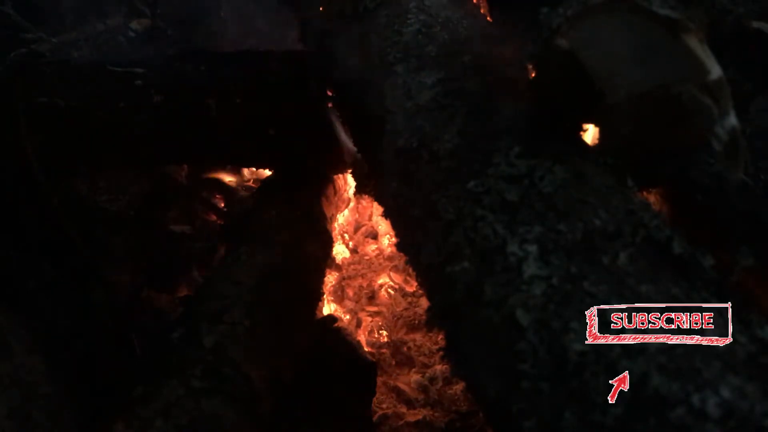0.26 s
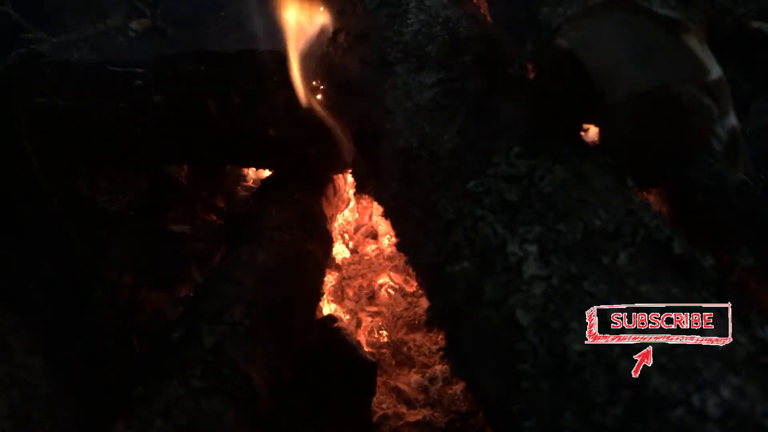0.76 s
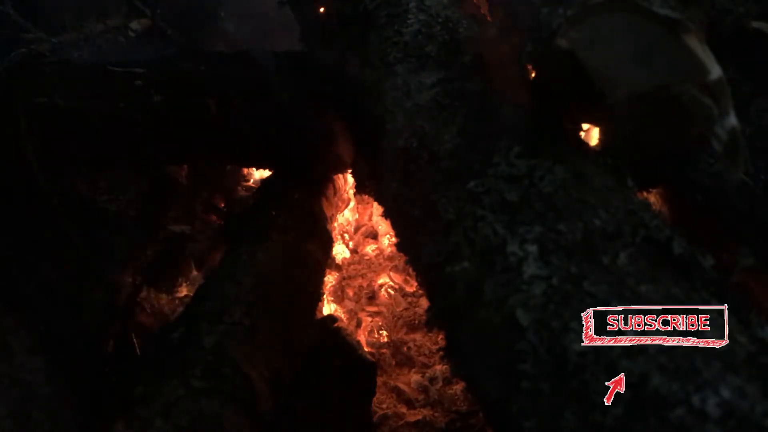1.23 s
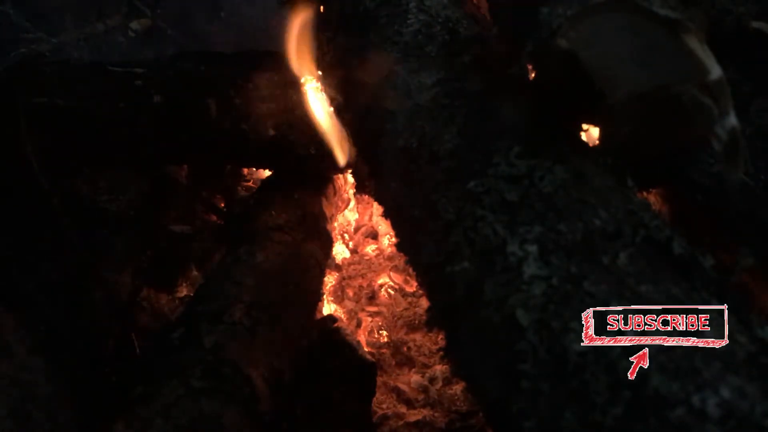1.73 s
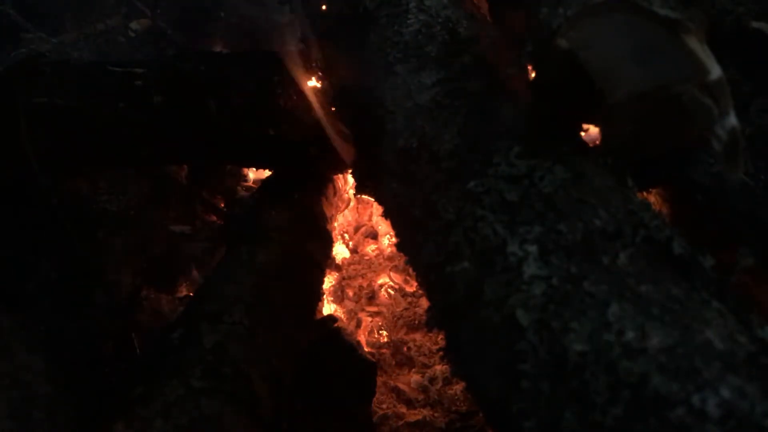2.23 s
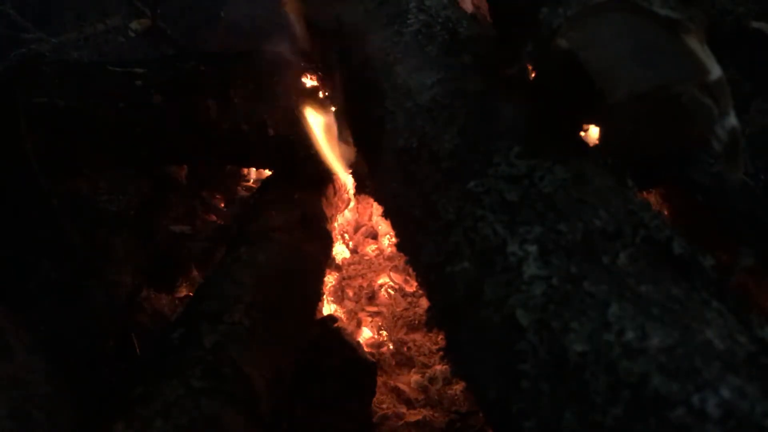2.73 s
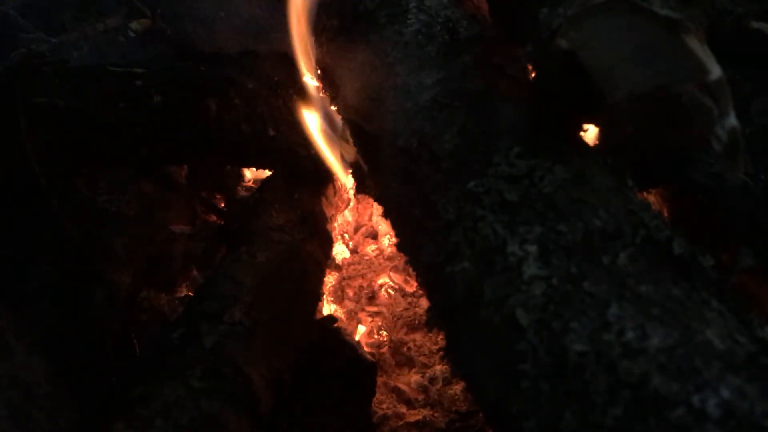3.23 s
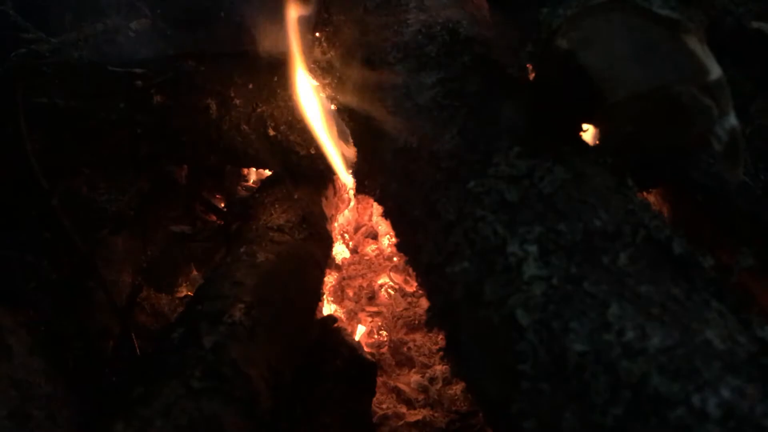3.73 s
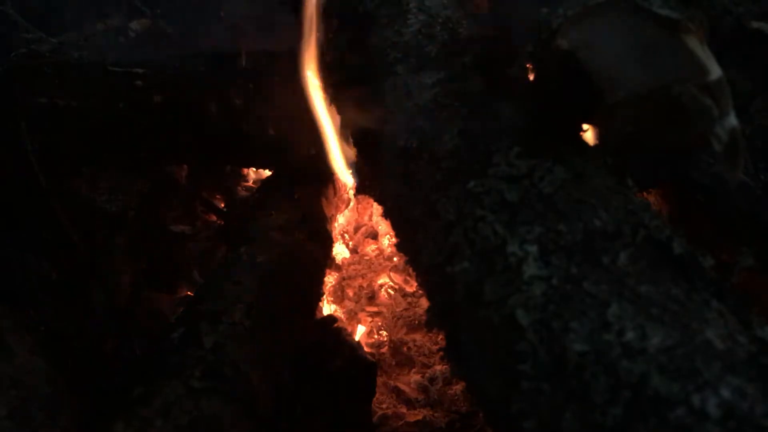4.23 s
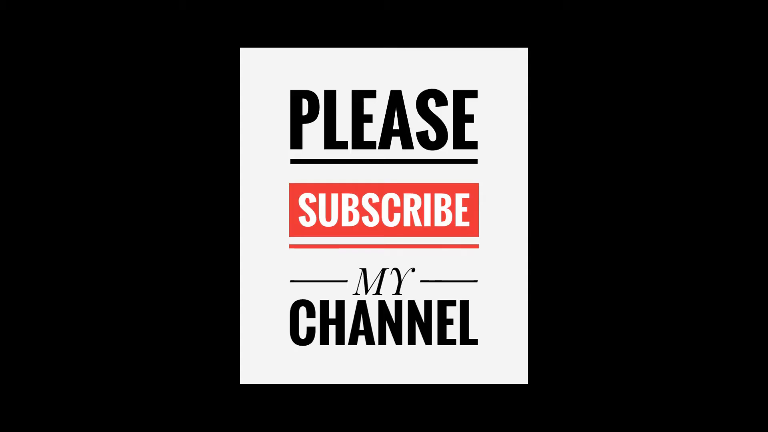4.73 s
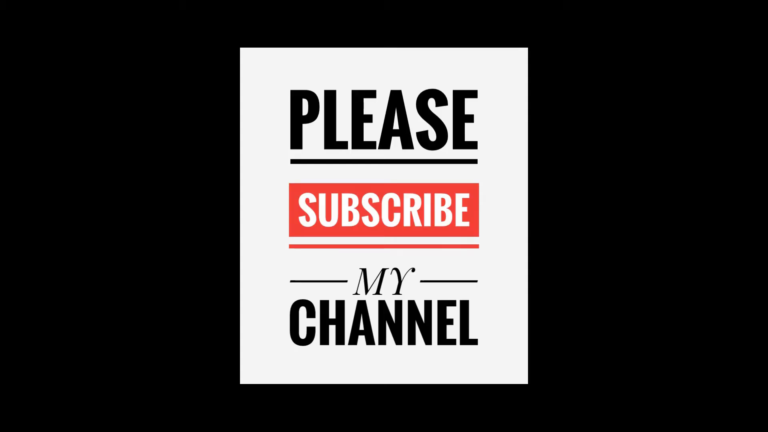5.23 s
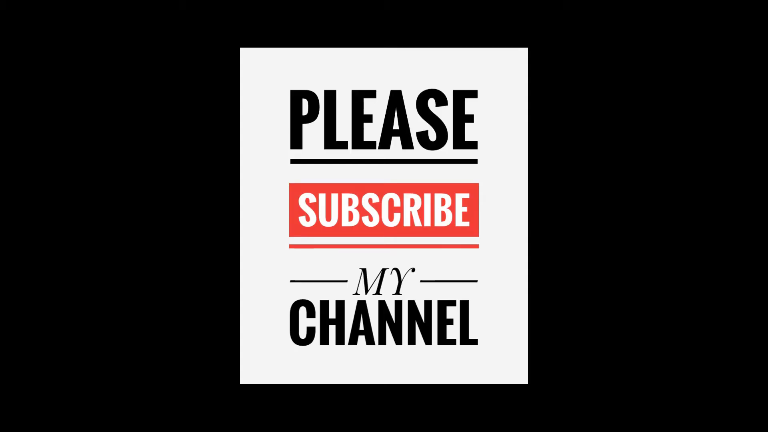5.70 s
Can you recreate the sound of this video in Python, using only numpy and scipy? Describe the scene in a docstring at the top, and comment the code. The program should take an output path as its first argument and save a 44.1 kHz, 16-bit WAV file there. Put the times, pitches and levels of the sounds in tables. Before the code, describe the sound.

A wide stereo night scene among trees, picked up close to a glowing fire. Thin, very high insect buzzing runs throughout, over shimmering crickets and regular right-side chirps. Sharp crackles cluster at the start and near the end, with soft low puffs between. A distant insect rasps four times; settling wood gives a dry double knock, then a fainter one.

```python
"""A katydid buzzes high and steady over a low campfire at night, among chirping and trilling crickets.
The katydid is two trains of sweeping pips, one per wing stroke; crickets are pulsed tones and banded noise.
The flame is noise with a fluttering bass; crackles are noise snaps, and igniting gas pops as short rings.
A distant insect rasps four times in pulsed noise, another peeps thinly in narrow noise.
A log settles with a double knock, then a fainter one, each a set of damped wood modes."""
import sys
import numpy as np
from scipy import signal
from scipy.fft import rfft, irfft
from scipy.io import wavfile

SR = 44100
rng = np.random.default_rng(int(sys.argv[2]) if len(sys.argv) > 2 else 0)


def wav_out(sig):
    """Save sig, one row per channel (or a flat mono array), as 16-bit PCM at SR to the path in sys.argv[1]."""
    wavfile.write(sys.argv[1], SR, np.round(np.clip(np.atleast_2d(sig).T, -1, 1) * 32767).astype(np.int16))


N = 262836
T = np.arange(N) / SR  # time (s)
HZ = np.fft.rfftfreq(N, 1 / SR)  # pitch of each spectrum bin
EDGE_HZ = 15750  # top of the sound's band

# effort of the near katydid: time_s, level_db
KATYDID_EFFORT = [(0.0, -34), (0.25, -36), (0.78, -34), (1.51, -36), (1.59, -34), (2.21, -35), (2.29, -39),
                  (2.52, -35), (3.17, -34), (3.2, -37), (4.07, -34), (4.1, -37), (4.35, -34), (4.45, -37),
                  (4.76, -35), (5.06, -36), (5.29, -34), (5.68, -37.5), (5.91, -36), (5.96, -38)]
# tone colour of the katydid's buzz: pitch_hz, gain_db
KATYDID_COLOUR = [(7500, -46), (8600, -0.5), (9500, -5), (10400, -6), (11400, -4), (12000, -5), (12600, -1),
                  (13200, -4), (14000, -3.5), (15500, -17)]
# its wings beat slower as the effort drops, and wander a little (rms)
WINGBEAT_HZ, WINGBEAT_HZ_PER_DB, WINGBEAT_WANDER_HZ = 115.6, 0.98, 0.6

# spectrum shape of the far, high cricket chorus: pitch_hz, relative_db_per_hz
CHORUS_COLOUR = [(6000, -28.5), (6500, -13.5), (6780, -6), (6880, -1), (7100, 4.5), (7280, 3), (7400, -2),
                 (7520, -14), (7750, -48)]

# spectrum shape of the open night air: pitch_hz, relative_db_per_hz
NIGHT_COLOUR = [(15, 8), (27, 31), (50, 12.5), (200, 16.5), (450, 12), (900, 7), (1500, -5), (4200, -3),
                (5800, -32), (8000, -32), (15500, -10)]
# faint far-off hum: pitch_hz, width_hz, level_db, left_right_difference (ratio)
HUM_BANDS = [(54.9, 7.7, -55, 0.26), (237, 5.6, -63.5, 0.68)]

# spectrum shape of the flame: pitch_hz, relative_db_per_hz
FLAME_COLOUR = [(10, 2), (22, -8), (38, 0), (56, 3), (75, -0.5), (150, -5), (300, -15.5), (600, -25),
                (1300, -30), (3000, -28.5), (5200, -33.5), (8000, -32.5), (15500, -49)]
# gain of the fire's soft sizzle: time_s, gain_db
SIZZLE_GAIN = [(0, 1.5), (.6, 2.5), (1.8, 2.2), (2.5, 2.5), (3.5, 2), (4.4, 3.5), (4.55, -2), (5.5, 0),
               (5.96, -2)]
# how hard the flame burns, used as swings around its mean: time_s, strength_db
BURN_STRENGTH = [(0.0, -46), (0.43, -43), (0.83, -46.5), (0.86, -43.5), (1.19, -39), (1.21, -48),
                 (1.54, -43.5), (2.14, -49.5), (2.22, -45), (3.19, -46.5), (3.22, -29), (3.32, -48),
                 (4.07, -44.5), (4.08, -49.5), (5.93, -44.5), (5.96, -40)]
# the rumble takes this share of the swings, and flutters at random: depth (rms dB), speed (per second)
BURN_SHARE, FLUTTER_DB, FLUTTER_PER_S = 0.5, 1.47, 10.4

# chirps of the nearest cricket, before each wing's own gain: middle_s, relative_level_db
CRICKET_CHIRPS = [(.05, -46), (.24, -45.5), (.49, -42.5), (.76, -45.5), (.98, -44), (1.38, -44.5),
                  (1.68, -43), (1.93, -45.5), (2.24, -47), (2.53, -48), (2.8, -51), (3.07, -44.5),
                  (3.34, -44), (3.63, -52), (3.89, -44.5), (4.16, -45.5), (4.52, -48), (4.82, -44),
                  (5.08, -46), (5.33, -44), (5.57, -47.5), (5.87, -46)]
# tones of the cricket's two wings: pitch_hz of the first, pitch_hz of the second
CRICKET_WING_HZ = (7252, 7095)

# loudest crackles of the wood: start_s, relative_level_db, centre_hz, decay_s
WOOD_CRACKLES = [(0.0294, -16.5, 3540, 0.00069), (0.243, -29, 7600, 0.0062), (.2542, -30, 5550, 0.0034),
                 (.349, -37, 5800, 0.0012), (0.3976, -27.5, 5870, 0.0017), (0.508, -31, 7500, 0.0054),
                 (0.922, -25, 3500, 0.0016), (1.652, -36, 5000, 0.0017), (2.285, -35.5, 2180, 0.0036),
                 (2.387, -40, 1500, 0.0025), (3.361, -42, 1790, 0.024), (3.457, -34, 2000, 0.0067),
                 (3.494, -31, 2940, 0.0037), (3.9042, -37, 2450, 0.0023), (5.267, -32, 6000, 0.00068),
                 (5.374, -26.5, 8000, 0.0022), (5.509, -37.5, 2590, 0.0021), (5.617, -35, 5000, 0.00092),
                 (5.771, -26.5, 1920, 0.002), (5.773, -24, 6000, 0.001)]
# each crackle also rings the wood around it: pitch, gain on the crackle's level, time to fall 60 dB
WOOD_HZ, WOOD_DB, WOOD_T60_S = 1430, -22, 0.02
# faint ember ticks: average rate, lowest level before colouring, scale of the random rise above it
TICKS_PER_S, TICK_DB, TICK_SPREAD_DB = 28, -37.5, 1.5

# puffs of gas catching fire: start_s, nominal_level_db, pitch_hz
GAS_PUFFS = [(0.246, -31.5, 334), (.896, -26.5, 154), (1.512, -32.5, 190), (2.528, -32, 159),
             (3.235, -33, 125), (3.771, -42, 256), (3.903, -37, 610), (5.374, -31, 223)]
PUFF_CYCLES = 10  # each falls 60 dB in this many cycles

# far rasps, all alike: start_s
RASP_STARTS = [0.586, 1.976, 3.347, 4.71]
# spectrum shape of the rasps: pitch_hz, relative_db_per_hz
RASP_SPECTRUM = [(1500, -19), (1850, -10), (2080, 7.5), (2400, -14), (3200, 0.5), (4100, 0.5), (4650, 1.5),
                 (5300, -1.5), (5900, -9.5), (8000, -30)]
RASP_S, RASP_DB = 0.32, -57.5  # length and nominal level of each

# thin peeps of another insect: middle_s, pitch_hz, level_db
THIN_PEEPS = [(.975, 5990, -56), (3.77, 6020, -63), (5.0, 6000, -60)]

# knocks of a shifting log: start_s, nominal_level_db, lowest_mode_extra_db
KNOCKS = [(3.388, -32, -30), (3.457, -34.5, 3.5), (4.227, -45, -15)]
# what the log rings with, lowest mode first: pitch_hz, gain_db, t60_s
WOOD_MODES = [(557, -2.5, 0.091), (848, 2.5, 0.085), (990, -20, 0.038), (1480, -11, 0.017),
              (2000, -5, 0.025)]


def amp(db):
    """Decibels to gain."""
    return 10 ** (np.asarray(db) / 20)


def unit(x):
    """Scales to rms 1."""
    return x / np.sqrt(np.mean(x ** 2) + 1e-20)


def curve(rows):
    """Joins (time_s, value) rows by straight lines."""
    return np.interp(T, *np.transpose(rows))


def colour(x, points):
    """Filters by (pitch_hz, gain_db) points joined on a log-frequency scale."""
    hz, db = np.transpose(points)
    gain_db = np.interp(np.log(HZ + 1), np.log(hz), db)
    return irfft(rfft(x) * amp(gain_db), N)


def band(x, hz, width):
    """A steep resonance."""
    return irfft(rfft(x) / (1 + 1j * (HZ - hz) / width) ** 4, N)


def lowpass(x, hz):
    """Rolls the treble off smoothly, halving the amplitude at the given pitch."""
    return irfft(rfft(x) / (1 + (HZ / hz) ** 4), N)


def drift(rate):
    """Smooth random movement of rms 1, mostly slower than rate cycles a second."""
    return unit(lowpass(rng.standard_normal(N), rate))


def stereo_noise(side):
    """White noise with a given amount of left-right difference."""
    mid, apart = rng.standard_normal((2, N))
    return unit(np.array([mid + side * apart, mid - side * apart]))


def pan(left_db):
    """Channel gains for a left-over-right level difference."""
    return unit(amp([[left_db / 2], [-left_db / 2]]))


def add(mix, s, sound):
    """Mixes a sound in at time s."""
    part = mix[..., max(round(s * SR), 0):][..., :sound.shape[-1]]
    part += sound[..., :part.shape[-1]]


def woods(x, wet_db, t60, side):
    """Direct sound plus the scatter from ground and trees, a decaying noise tail."""
    tail = (stereo_noise(side) * amp(-60 * T / t60))[:, :SR // 2]
    tail /= np.linalg.norm(tail, axis=1, keepdims=True)
    return x + amp(wet_db) * signal.fftconvolve(x[None], tail, axes=1)[:, :N]


def strokes(rate, offset, hz, fall_hz, length, jitter, spread_db):
    """One wing stroke a cycle: a short pip whose pitch falls as the scraper slows."""
    turns = np.cumsum(rate) / SR
    cycle = np.floor(turns - offset).astype(int) + 1
    # every stroke draws its own timing, loudness, pitch and phase
    late, size, detune, slip = rng.standard_normal((N // 100, 4))[cycle].T
    t = ((turns - offset) % 1 - .5) / rate + jitter * late
    sweep = hz * (1 + 0.014 * detune) * t - fall_hz * t ** 2 / (2 * length)
    swell = np.exp(-.5 * (t / length) ** 2)
    return amp(spread_db * size) * swell * np.cos(2 * np.pi * (sweep + slip))


def katydid():
    """A strong closing stroke and a weaker opening stroke alternate, over the hiss of farther singers."""
    effort_db = curve(KATYDID_EFFORT)
    effort_swing_db = effort_db - effort_db.mean()
    rate = WINGBEAT_HZ + WINGBEAT_HZ_PER_DB * effort_swing_db + WINGBEAT_WANDER_HZ * drift(4)
    closing = strokes(rate, 0, hz=11345, fall_hz=1010, length=0.00041, jitter=.00008, spread_db=1.5)
    opening = strokes(rate, 0.51, hz=12200, fall_hz=990, length=0.00073, jitter=0.000199, spread_db=1.6)
    near = woods(unit(closing + amp(-10.0) * opening), wet_db=2.1, t60=0.17, side=0.9)
    far_colour = [(8000, -37), (10000, -3.5), (11500, 0.5), (12800, -3), (14000, -11.5), (15500, -7.5)]
    far = colour(stereo_noise(side=0.57), far_colour)
    song = colour(unit(near) + amp(-3.5) * unit(far), KATYDID_COLOUR)
    return song / np.std(song.mean(0)) * amp(effort_db) * pan(0.045)


def far_crickets():
    """Many singers merge into two shimmering bands, a high one and a low one."""
    shimmer_db = 1.0 * drift(2.6)
    high = unit(colour(stereo_noise(side=0.62), CHORUS_COLOUR)) * amp(-45.0 + shimmer_db) * pan(-5.5)
    low = band(stereo_noise(side=0.29), hz=3873, width=200)
    low = unit(low + band(stereo_noise(side=0.55), hz=3981, width=170))
    trill = 1 + 0.076 * np.sin(2 * np.pi * 51 * T)  # the low singers' pulse rate
    return high + amp(-56.0) * low * trill


def night():
    """Wide, even air as coloured noise, with a faint far-off hum of narrow noise bands."""
    air = amp(-56.0) * unit(colour(stereo_noise(side=1), NIGHT_COLOUR))
    hum = sum(amp(db) * unit(band(stereo_noise(side), hz, width)) for hz, width, db, side in HUM_BANDS)
    return air + hum


def flame():
    """Burning gas flutters in the bass; the embers sizzle above it."""
    air = amp(-45.0) * unit(colour(stereo_noise(side=0.31), FLAME_COLOUR))
    rumble = lowpass(air, 200)
    body = lowpass(air, 800) - rumble
    sizzle = air - rumble - body
    burn_db = curve(BURN_STRENGTH)
    flutter_db = BURN_SHARE * (burn_db - burn_db.mean()) + FLUTTER_DB * drift(FLUTTER_PER_S)
    # the body follows the rumble by half, with a faster flutter of its own
    burning = rumble * amp(flutter_db) + body * amp(.5 * flutter_db + 2.95 * drift(31))
    return burning + sizzle * amp(curve(SIZZLE_GAIN) + 1.93 * drift(15))


def cricket(hz, length, pulse_hz, left_db):
    """Each chirp is a few pulses of one wing tone, blurred by the trees."""
    swell = sum(amp(db) * np.exp(-((T - s) / length) ** 4) for s, db in CRICKET_CHIRPS)
    pulses = np.sin(np.pi * np.cumsum(pulse_hz + 3 * drift(6.5)) / SR) ** 2
    tone = np.sin(2 * np.pi * np.cumsum(hz + 22 * drift(60.5)) / SR)
    return woods(swell * (.5 + pulses) * tone, wet_db=-1.5, t60=0.1, side=0.42) * pan(left_db)


def blow(hz, t60, ring, rough):
    """A soft blow: a brief ring and a rough puff around the same pitch."""
    t = T[:SR // 4]
    peak = signal.iirpeak(hz, 1.2, fs=SR)
    puff = signal.lfilter(*peak, rng.standard_normal(len(t)))
    puff = unit(signal.lfilter(*peak, puff))
    return amp(-60 * t / t60) * (ring * np.sin(2 * np.pi * hz * t) + rough * puff)


def crackles():
    """Pockets of steam burst in the wood: a sharp snap with a dying spray, among tiny random ticks."""
    out, t = np.zeros(N), T[:SR // 16]
    for s, db, hz, decay in WOOD_CRACKLES:
        burst = rng.standard_normal(len(t)) * np.exp(-t / decay)
        peak = signal.iirpeak(min(hz, SR / 3), 1.0, fs=SR)
        snap = signal.lfilter(*peak, burst) + 0.036 * burst
        # energy set by the decay, so long and short snaps start about equally strong
        level = np.sqrt(decay * SR / np.sum(snap ** 2)) * 0.44
        add(out, s, amp(db) * snap * level)
        add(out, s, amp(db + WOOD_DB) * blow(WOOD_HZ, WOOD_T60_S, ring=0.83, rough=0.37))
    tick_db = TICK_DB + TICK_SPREAD_DB * np.minimum(rng.exponential(1, N), 3)
    ticks = (rng.random(N) < TICKS_PER_S / SR) * amp(tick_db)
    out += colour(ticks, [(200, -13), (1500, 5.0), (6000, 0), (15000, -8)])
    return woods(out, wet_db=-7, t60=0.1, side=1.0)


def puffs():
    """Pockets of gas catch fire with dull pops; the lower ones last longer."""
    out = np.zeros(N)
    for s, db, hz in GAS_PUFFS:
        add(out, s, amp(db) * blow(hz, PUFF_CYCLES / hz, ring=0.67, rough=0.42))
    return woods(out, wet_db=-12, t60=0.03, side=0.5)


def far_rasps():
    """A distant insect scrapes rapid, uneven pulses, made of coloured noise."""
    swell = sum(np.exp(-abs(2 * (T - s) / RASP_S - 1) ** 4) for s in RASP_STARTS)
    teeth = 1 + 0.64 * np.sin(2 * np.pi * np.cumsum(88 + 15 * drift(17.9)) / SR)
    teeth = teeth * amp(1.0 * drift(25))
    scrape = unit(colour(rng.standard_normal(N), RASP_SPECTRUM))
    return amp(RASP_DB) * woods(scrape * swell * teeth, wet_db=3.5, t60=0.38, side=0.49)


def far_peeps():
    """Another insect peeps thinly: narrow noise bands under short, rounded swells."""
    out = 0
    for s, hz, db in THIN_PEEPS:
        swell = np.exp(-((T - s) / 0.053) ** 2)
        out = out + amp(db) * swell * unit(band(stereo_noise(side=0.29), hz, width=150))
    return out


def log_shift():
    """A log settles: each knock rings the same dry modes, with its own share of the lowest."""
    out = np.zeros(N)
    for s, db, low_db in KNOCKS:
        modes = [blow(hz, t60, ring=0.65, rough=0.31) * amp(mode_db) for hz, mode_db, t60 in WOOD_MODES]
        lowest, *upper = modes
        add(out, s, amp(db) * (amp(low_db) * lowest + sum(upper)))
    return woods(out, wet_db=-19, t60=0.022, side=0.6)


def scene():
    """Insects all round, the chirping cricket to the right, the fire in the middle."""
    first_hz, second_hz = CRICKET_WING_HZ
    chirps = amp(-0.5) * cricket(first_hz, length=0.074, pulse_hz=40.6, left_db=-7)
    # the second wing rings a little lower
    chirps += amp(-5.0) * cricket(second_hz, length=0.029, pulse_hz=39, left_db=-17)
    insects = katydid() + far_crickets() + chirps + far_rasps() + far_peeps()
    fire = flame() + crackles() + puffs() + log_shift()
    return insects + night() + fire


def record(dry):
    """Limits the band with a steep low-pass at EDGE_HZ."""
    lowpass_taps = signal.firwin(511, EDGE_HZ, window=("kaiser", 9), fs=SR)
    return signal.oaconvolve(dry, lowpass_taps[None], "same")


dry = scene()
out = record(dry)
wav_out(out)
```